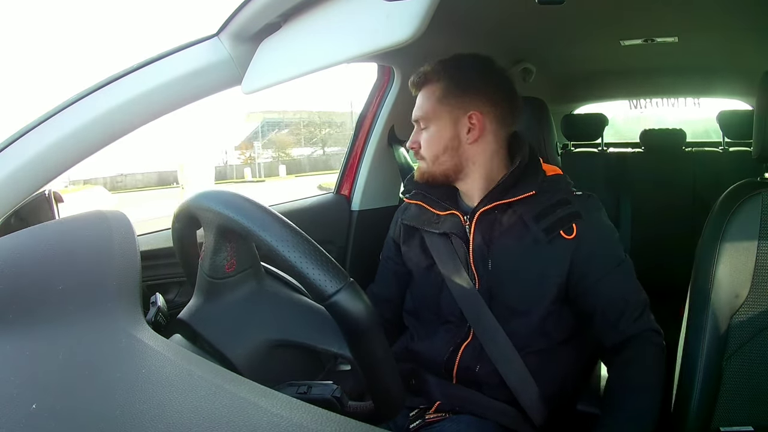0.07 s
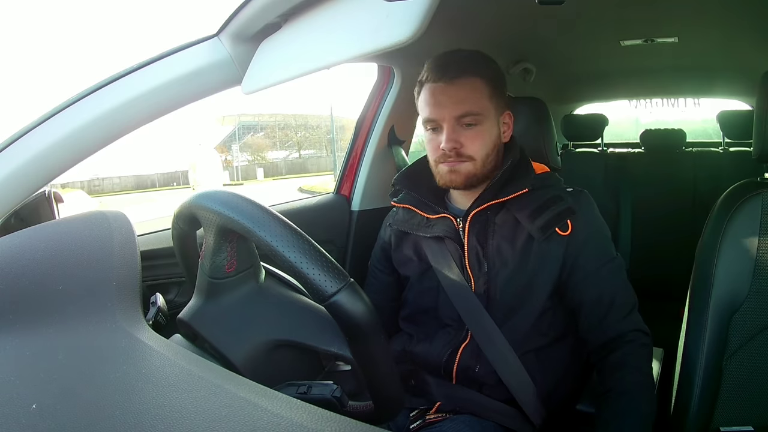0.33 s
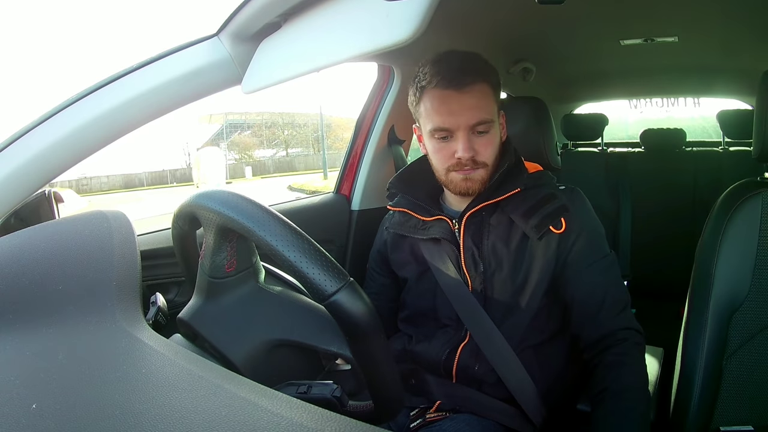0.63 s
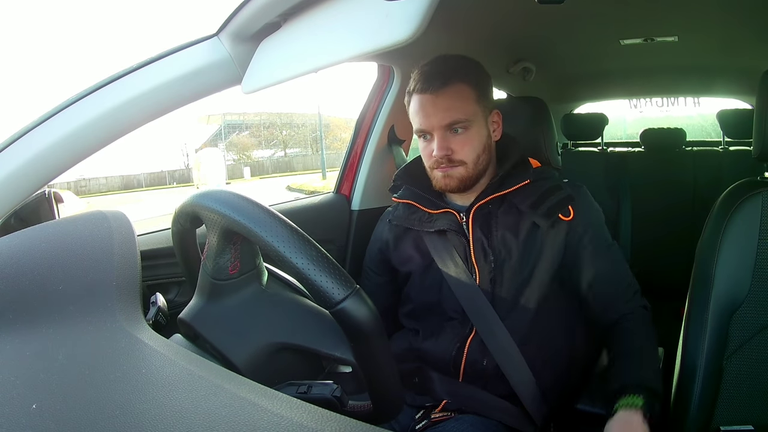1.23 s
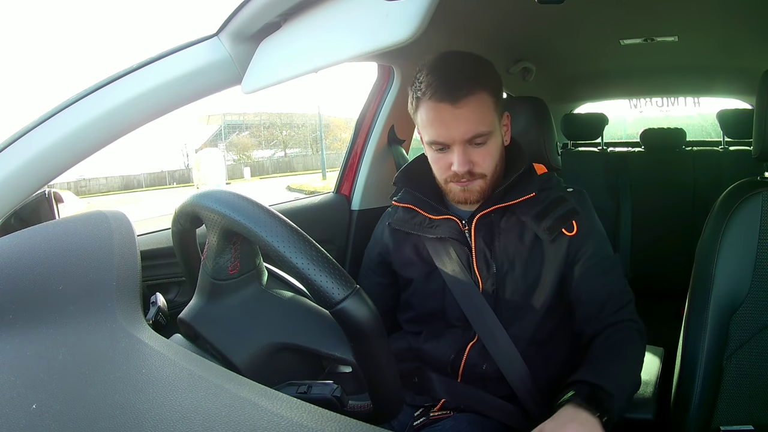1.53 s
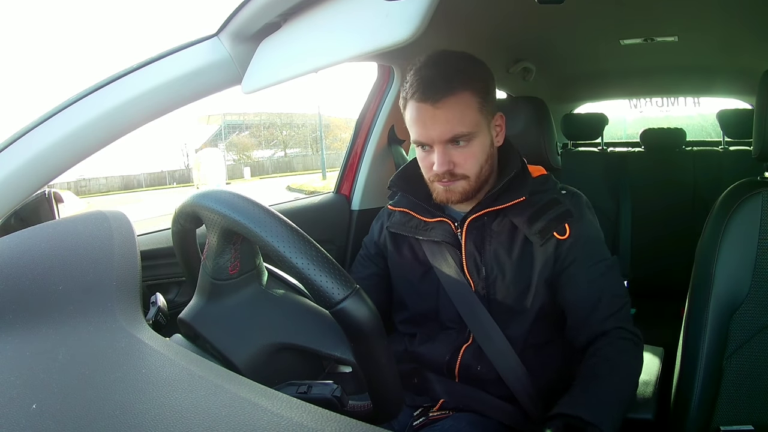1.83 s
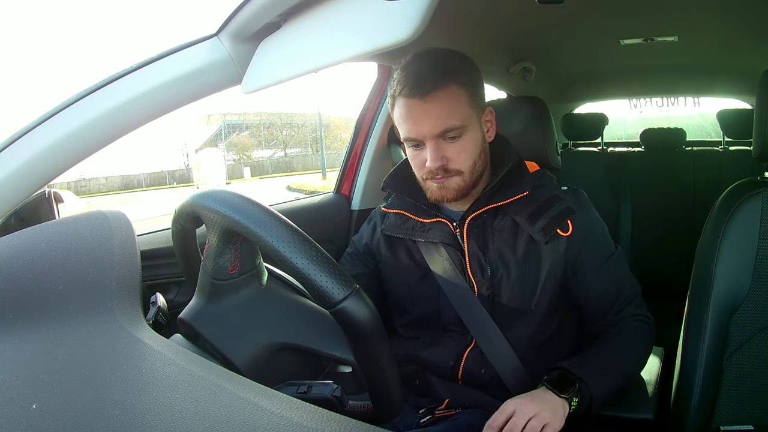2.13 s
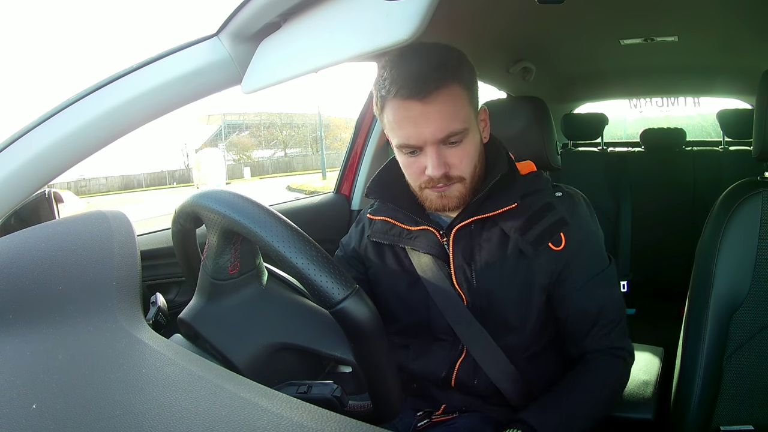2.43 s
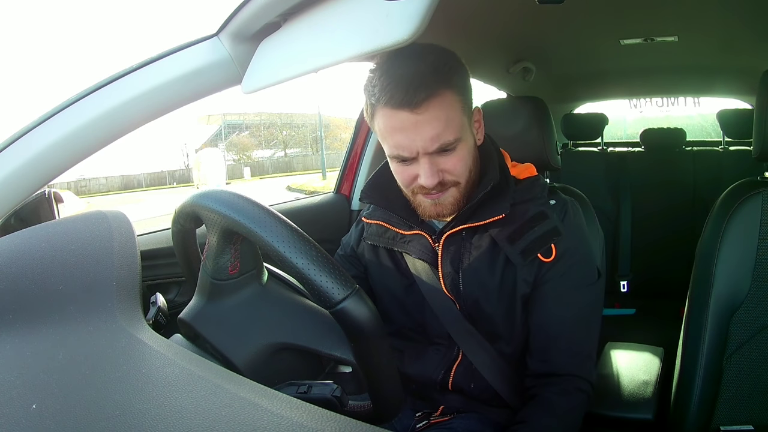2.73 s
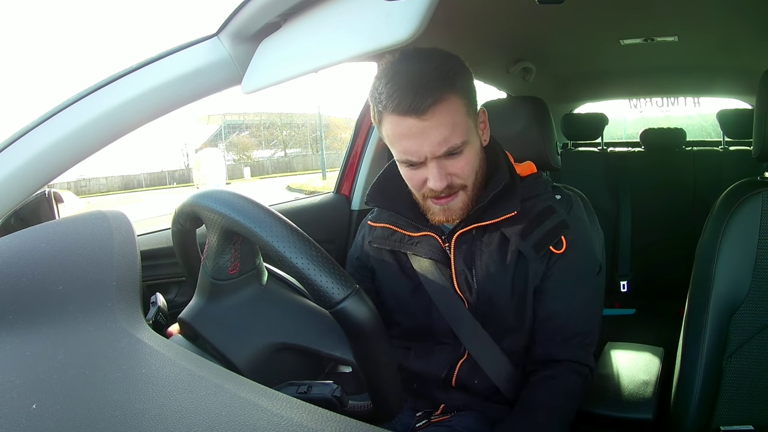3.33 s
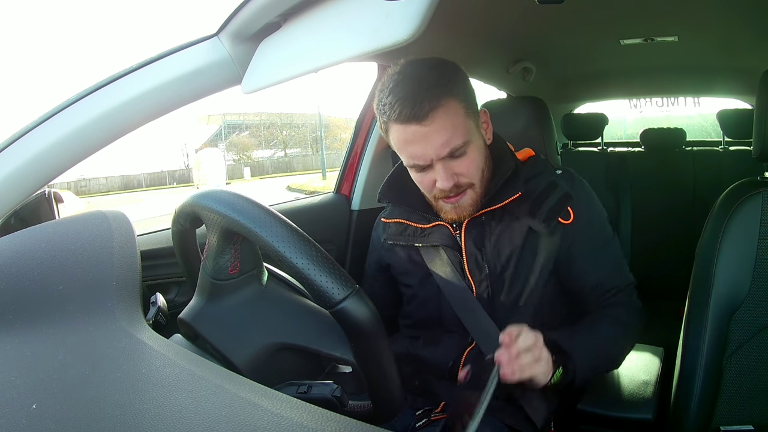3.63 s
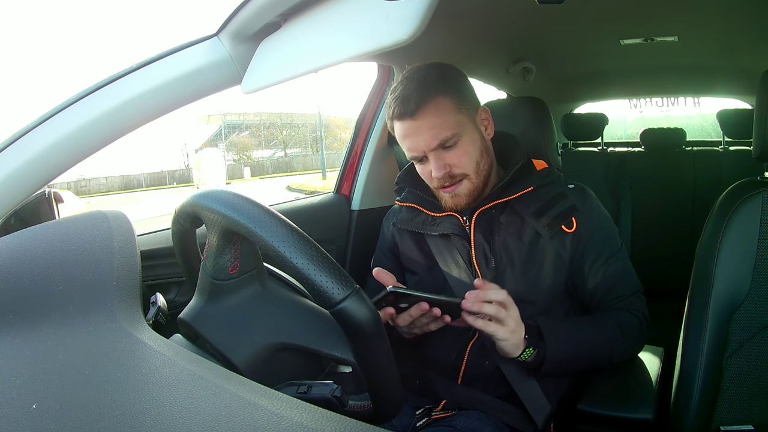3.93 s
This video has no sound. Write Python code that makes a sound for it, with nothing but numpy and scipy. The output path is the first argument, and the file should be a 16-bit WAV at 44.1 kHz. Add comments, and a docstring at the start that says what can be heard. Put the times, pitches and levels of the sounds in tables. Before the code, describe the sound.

Inside a parked car, an idling engine rumbles close to the microphone. A quick, loud handbrake ratchet is followed by dull knocks and small clicks. The engine shudders to a stop with a heavy thump, leaving soft clothing rustle.

```python
"""Inside a parked car: the engine idles, its firing beat booming through the cabin.
The handbrake is pulled up, its pawl cracking over the ratchet teeth, and the engine is switched off.
It runs down to a stop, rocking the body, and ends on a heavy thump. Hands knock and scrape on the
plastic trim, small parts tick, and the driver shuffles in the seat with a rustling jacket."""
import sys
import numpy as np
from scipy import signal
from scipy.fft import rfft, irfft
from scipy.io import wavfile

SR = 44100
rng = np.random.default_rng(int(sys.argv[2]) if len(sys.argv) > 2 else 0)


def master_out(mix):
    """Clip the mix to full scale and print it as 16-bit PCM to the path in sys.argv[1]."""
    frames = np.transpose(np.atleast_2d(mix))
    ceiling = np.clip(frames, -1, 1)
    pcm = np.round(ceiling * 32767).astype(np.int16)
    wavfile.write(sys.argv[1], SR, pcm)


N = 176400
T = np.arange(N) / SR


def amp(db):
    """Decibels to gain."""
    return 10 ** (np.asarray(db) / 20)


def unit(x):
    """Scales to rms 1."""
    return x / np.sqrt(np.mean(x ** 2) + 1e-20)


def curve(points):
    """An automation curve through (t/s, value) points."""
    return np.interp(T, *np.transpose(points))


def eq_gain(points, hz):
    """Gain at hz of an EQ curve drawn through (f/Hz, level/dB) points on a log-frequency axis."""
    f, db = np.transpose(points)
    return amp(np.interp(np.log(hz + 1e-6), np.log(f), db))


def noise(points, size=N, scale=1):
    """Noise of rms 1 coloured by an EQ curve whose frequencies are multiplied by scale."""
    hz = np.fft.rfftfreq(size, 1 / SR)
    white = rfft(rng.standard_normal(size))
    return unit(irfft(white * eq_gain(points, hz / scale) * (hz > 0), size))


def drift(hz, size=16384):
    """Random modulation of rms about 1, rolling off above the given rate."""
    rates = np.fft.rfftfreq(size, T[-1] / size)
    white = rfft(rng.standard_normal(size))
    slow = unit(irfft(white / (1 + (rates / hz) ** 4), size))
    return np.interp(T, np.linspace(0, T[-1], size), slow)


def attack(t, rise):
    """Linear fade-in over rise seconds."""
    return np.minimum(t / rise, 1)


def fade(t, t60):
    """Exponential decay, 60 dB down after t60 seconds."""
    return np.exp(-np.log(1000) * t / t60)


def ring(t, hz, t60, rise):
    """One damped mode with a soft start."""
    return np.sin(2 * np.pi * hz * t) * fade(t, t60) * (1 - np.exp(-(t / rise) ** 2))


def add(mix, s, sound):
    """Mixes a sound in at s seconds."""
    part = mix[max(round(s * SR), 0):][:len(sound)]
    part += sound[:len(part)]


def engine():
    """Wavering orders of the firing rate slide through the cabin's boom; each firing puffs noise."""
    firing_rate = [(0, 24.3), (.16, 25), (.45, 27.3), (.99, 26.7), (1.44, 27.3), (2.02, 23.5), (2.22, 23.8),
                   (2.56, 21.2), (2.75, 11.6), (3.0, 5.75)]  # idle and run-down: t/s, f/Hz
    fader = [(0, -38), (.6, -36.5), (.75, -39), (1.2, -37.5), (1.5, -37.5), (1.75, -35), (2.2, -38),
             (2.48, -40.5), (2.57, -46.5), (2.8, -48), (3.1, -39), (3.3, -81)]  # engine loudness: t/s, level/dB
    boom = [(15, 8.5), (26, -13.5), (52, -10), (77, 2.5), (103, -2.5), (130, -2.5), (156, 0), (182, -13.5),
            (235, -29), (320, -30), (500, -47.5)]  # how the cabin passes the beat: f/Hz, level/dB
    hz = curve(firing_rate)
    phase = 2 * np.pi * np.cumsum(hz) / SR
    beat, power = np.zeros(N), np.zeros(N)
    for order in range(1, 13):
        gain = eq_gain(boom, order * hz)
        waver = 1 + 0.26 * drift(hz=5.8)
        beat += gain * waver * np.cos(order * phase + 2 * np.pi * rng.random())
        power += gain ** 2 / 2
    beat /= np.sqrt(power)  # the boom sets the colour, the fader the level
    puffs = unit(noise(boom) * (1 + 0.35 * np.cos(phase)))
    return amp(curve(fader)) * (beat + amp(-7.5) * puffs)


def background():
    """Deep rumble of the car body and the steady murk from outside."""
    fader = [(0, -34), (.17, -39), (.26, -30.5), (.32, -42), (.39, -36.5), (.6, -51), (.85, -38.5),
             (1.2, -41), (1.7, -65), (2.3, -47.5), (2.75, -44), (2.92, -54), (3.04, -37), (3.2, -46.5),
             (3.6, -59), (4, -78)]  # swells of the rumble: t/s, level/dB
    # colours of the murk and the rumble: f/Hz, level/dB
    murk_eq = [(20, -17.5), (70, 4), (130, -0.5), (200, 1.5), (300, -10.5), (500, -16.5), (1000, -22.5),
               (2000, -35.5), (3200, -49), (4200, -45), (7000, -65), (12000, -52)]
    rumble_eq = [(10, -25), (24, -22.5), (38, -5.5), (50, -12.5), (80, -13), (300, -64), (1000, -100)]
    return amp(curve(fader)) * noise(rumble_eq) + amp(-50) * noise(murk_eq)


def jacket():
    """Fine grains of sliding fabric swell with each arm movement; a low groan comes with one reach."""
    rustle_fader = [(0, -58), (.15, -61), (.33, -59), (.5, -67.5), (.65, -65), (.9, -70.5), (1.15, -73),
                    (1.28, -56), (1.45, -54), (1.68, -58.5), (1.82, -68), (1.95, -68), (2.2, -60),
                    (2.42, -60.5), (2.57, -62.5), (2.78, -61.5), (2.95, -65), (3.15, -69.5), (3.33, -60.5),
                    (3.45, -52.5), (3.55, -52.5), (3.63, -47.5), (3.75, -60.5), (3.87, -57.5), (4, -57.5)]  # arm movements: t/s, level/dB
    cloth_eq = [(100, -10), (400, -1), (900, 1), (1500, -1.5), (2200, -1), (3200, -7), (4200, -4),
                (5500, -8), (7000, -9.5), (9500, -13), (12000, -12.5)]  # colour of the fabric: f/Hz, level/dB
    groan_fader = [(3.33, -49), (3.4, -44), (3.46, -39), (3.51, -37.5), (3.56, -52.5), (3.7, -81)]  # swell of the groan: t/s, level/dB
    cloth = noise(cloth_eq)
    grain_db, flutter_db = drift(hz=820), 0.5 * drift(hz=32)
    rustle = unit(cloth * amp(grain_db + flutter_db))
    groan_hz = 140.4 + 9.13 * drift(hz=30.4)
    groan = np.sin(2 * np.pi * np.cumsum(groan_hz) / SR) * (1 + 0.3 * drift(hz=50))
    return amp(curve(rustle_fader)) * rustle + amp(curve(groan_fader)) * unit(groan)


def seat():
    """The driver's shifting weight makes a lumpy, muffled shuffle."""
    fader = [(0, -47), (.15, -60.5), (.75, -62.5), (.92, -51.5), (1.0, -55), (1.13, -46.5), (1.2, -59),
             (1.4, -40.5), (1.5, -50), (1.62, -60), (1.8, -51), (2.28, -50.5), (2.36, -58), (2.8, -62.5),
             (2.88, -47.5), (2.94, -53), (3.0, -45.5), (3.16, -58.5), (3.3, -53), (3.36, -61.5),
             (3.46, -48), (3.6, -63.5), (4, -65)]  # shifts of weight: t/s, level/dB
    seat_eq = [(80, -24), (190, 1.5), (280, -3), (400, -8), (600, -17), (1000, -24), (2000, -40.5),
               (6000, -54)]  # colour of the shuffle: f/Hz, level/dB
    lumps = amp(3.1 * drift(hz=35))
    return amp(curve(fader)) * unit(noise(seat_eq) * lumps)


def ticks():
    """Small hard plastic parts each click once."""
    cues = [(.077, -46.5, 2100), (.634, -56.5, 2320), (1.478, -48, 1400), (1.76, -52, 1200),
            (1.942, -52, 1940), (2.247, -53, 1600), (3.233, -48, 1750), (3.007, -52, 4360),
            (3.11, -60.5, 5500)]  # clicks: t/s, level/dB, f/Hz
    tick_eq = [(.2, -9), (.75, -14), (1, 1.5), (1.25, -14), (3, -20.5), (6, -29)]  # colour of a click: ratio to its pitch, level/dB
    out, t = np.zeros(N), T[:SR // 8]
    envelope = attack(t, rise=0.0013) * fade(t, t60=0.036)
    for s, db, hz in cues:
        add(out, s, amp(db) * noise(tick_eq, size=len(t), scale=hz) * envelope)
    return out


def knocks():
    """Padded plastic answers a knock with two low modes and a hollow tap; soft touches swell slower."""
    # hands on the trim: t/s, body level/dB, body f/Hz, tap level/dB, tap f/Hz, rise/s
    cues = [(.088, -35.5, 270, -58, 498, 0.0035), (1.091, -26, 243, -39.5, 754, 0.002),
            (1.438, -17, 200.7, -38.5, 460, 0.0066), (1.552, -36, 223, -31, 550, .002),
            (1.715, -32, 276, -43, 480, 0.011), (1.762, -26, 271, -48, 790, 0.008),
            (1.796, -29, 213, -44, 452, 0.0079), (1.853, -34, 332, -41.5, 478, 0.0051),
            (1.937, -28, 315, -43, 500, 0.0067), (1.95, -40, 331, -48.5, 700, .003),
            (1.976, -28.5, 266, -55, 450, .01), (2.047, -25, 304.4, -39.5, 595, 0.0041),
            (2.061, -29.5, 292, -40, 550, 0.0043), (2.086, -25.5, 273, -40, 551.4, 0.0064),
            (2.11, -36, 320, -49, 520, 0.0052), (2.147, -29.5, 299.5, -40.5, 470, .003),
            (2.174, -28, 281, -44, 470, 0.0076), (2.20, -45, 280, -63, 480, 0.0063),
            (2.228, -27, 239.5, -44, 441, 0.011), (2.245, -32.5, 284, -50, 910, .006),
            (2.275, -34, 223, -51, 600, 0.0087), (2.52, -43.5, 269, -51, 700, 0.0048),
            (2.859, -30, 177, -46, 398, 0.0075), (2.872, -36, 320, -46, 480, 0.0055),
            (3.229, -28.5, 319.6, -58, 600, 0.0046), (3.258, -21.5, 179, -51, 610, 0.0058)]
    tap_eq = [(.2, 2), (.6, -1.5), (1, 1), (1.5, -14), (3, -30), (8, -48), (20, -76)]  # colour of a tap: ratio to its pitch, level/dB
    body_t60, tap_t60, scuff_t60 = 0.092, 0.041, 0.091  # seconds
    out, t = np.zeros(N), T[:SR // 4]
    for s, body_db, body_hz, tap_db, tap_hz, rise in cues:
        low_mode = amp(-4.5) * ring(t, 0.735 * body_hz, body_t60, rise)
        body = ring(t, body_hz, body_t60, rise) + low_mode
        envelope = attack(t, rise) * fade(np.maximum(t - rise, 0), scuff_t60)
        scuff = noise(tap_eq, size=len(t), scale=tap_hz) * envelope
        tap = amp(-1) * (ring(t, tap_hz, tap_t60, rise / 2) + scuff)
        add(out, s, amp(body_db) * body + amp(tap_db) * tap)
    return out


def handbrake():
    """The pawl cracks over each tooth and jolts the lever; the run keeps steel and console ringing."""
    teeth = [(1.295, -25, -1), (1.3032, 0, 1), (1.311, -1, 0), (1.318, -2, 5), (1.3244, 1, 6),
             (1.332, 1, -1), (1.341, 1, 0), (1.3498, 1.5, -5), (1.357, -8, -5), (1.3646, -2, -5),
             (1.37, -8, -7)]  # ratchet teeth: t/s, level/dB, treble tilt of the ring/(dB per octave)
    crack_eq = [(100, -2), (280, 2), (550, 1), (850, -4), (1300, -6), (1900, 0), (2500, -6.5), (3300, -9.5),
                (4300, -5), (5500, -4.5), (7000, -7.5), (9500, -10.5), (12000, -12)]  # colour of a tooth's crack: f/Hz, level/dB
    modes = [(199, -40.5, 0.11), (277.7, -39.5, 0.12), (330, -45, 0.12), (436, -37.5, .11),
             (515, -45, 0.091), (578, -44, .1), (690, -49, .08), (1462, -42.5, 0.087), (1842, -39, 0.058),
             (1980, -39, 0.067), (2770, -48, 0.094), (3974, -38, 0.045), (4200, -46.5, 0.067),
             (4660, -41, .05), (5000, -49, .06), (5220, -47, .06), (6200, -56, 0.044)]  # pawl, lever and console resonances: f/Hz, level/dB, t60/s
    tilt_pivot_hz, wander_rad = 1900, 0.78
    out, t = np.zeros(N), T[:SR // 4]
    snap = amp(-27.5) * fade(t, t60=0.065)
    cabin_tail = amp(-49.5) * fade(t, t60=0.18)
    lever = amp(-24.5) * ring(t, hz=128, t60=0.07, rise=0.0033)
    for s, db, _ in teeth:
        crack = noise(crack_eq, size=len(t)) * (snap + cabin_tail)
        add(out, s, amp(db) * (crack + lever) * attack(t, rise=0.0017))
    for hz, mode_db, t60 in modes:
        octaves_above = max(np.log2(hz / tilt_pivot_hz), 0)
        kick = attack(t, rise=0.0016) * fade(t, t60)
        envelope = np.zeros(N)
        for s, db, tilt in teeth:
            add(envelope, s, amp(mode_db + db + tilt * octaves_above) * kick)
        out += envelope * np.sin(2 * np.pi * hz * T + wander_rad * drift(hz=50))
    return out


def shudders():
    """The car body rocks on the last strokes of the engine and after the thump."""
    thuds = [(2.335, -23, 85, 0.076), (2.382, -26, 80, 0.11), (2.469, -19.5, 72.5, .12),
             (2.605, -23, 85, 0.096), (2.67, -23, 72.4, 0.076), (2.752, -20, 90, 0.075),
             (2.851, -18.5, 131, 0.048), (2.874, -18.5, 148.5, 0.088), (2.98, -17, 121, 0.042),
             (3.023, -20, 72.4, 0.33), (3.034, -15, 191, 0.076), (3.101, -24.5, 115, 0.087)]  # dull body modes: t/s, level/dB, f/Hz, t60/s
    out, t = np.zeros(N), T[:SR // 2]
    for s, db, hz, t60 in thuds:
        add(out, s, amp(db) * ring(t, hz, t60, rise=0.0045))
    return out


def scrapes():
    """A hand slips unevenly over plastic."""
    slips = [(2.625, 0.02, -43.5), (2.644, 0.041, -45), (3.23, 0.019, -44.5), (3.257, 0.018, -46.5)]  # short strokes: t/s, length/s, level/dB
    scrape_eq = [(150, -11), (350, 6.5), (520, -3.5), (720, 1), (1000, -8), (1600, -14), (2700, -18.5),
                 (3400, -23), (4500, -23), (7000, -31), (12000, -32)]  # colour of the friction: f/Hz, level/dB
    edge_s = 0.0037
    force = np.zeros(N)
    for s, length, db in slips:
        inside_s = np.minimum(T - s, s + length - T)
        force += amp(db) * np.clip(inside_s / edge_s + 0.5, 0, 1)
    return force * unit(noise(scrape_eq) * amp(drift(hz=170)))


def thump():
    """One sharp push and its rebound as the engine stops; a plastic panel clacks and rings briefly."""
    clack_eq = [(150, -1), (350, 11), (560, -12), (850, 0), (1300, -3), (2000, -23), (3200, -27),
                (4300, -20), (6000, -25.5), (12000, -24.5)]  # colour of the clack: f/Hz, level/dB
    panel_modes = [(390, -30, 0.047), (850, -34, 0.036), (1275, -41, .04)]  # panel resonances: f/Hz, level/dB, t60/s
    push_s, push_width_s = 3.0214, 0.00044
    rebound_s, rebound_width_s = 3.0233, 0.00064
    push = amp(-15.5) * np.exp(-((T - push_s) / push_width_s) ** 2 / 2)
    rebound = amp(-12.5) * np.exp(-((T - rebound_s) / rebound_width_s) ** 2 / 2)
    out, t = push - rebound, T[:SR // 4]
    clack = amp(-34) * noise(clack_eq, size=len(t)) * attack(t, rise=0.00111) * fade(t, t60=0.061)
    panel = sum(amp(db) * ring(t, hz, t60, rise=0.00044) for hz, db, t60 in panel_modes)
    add(out, push_s - push_width_s, clack + panel)
    low_cut = signal.butter(1, 45, "high", fs=SR, output="sos")
    return signal.sosfilt(low_cut, out)


def scene():
    """Car and driver in mono, heard from the dashboard."""
    car = engine() + background() + shudders() + thump()
    driver = jacket() + seat() + ticks() + knocks() + handbrake() + scrapes()
    return (car + driver)[None]


def record(dry):
    """The microphone's treble notch, its own hiss and a steep high cut."""
    notch_hz, notch_width_hz, high_cut_hz = 8010, 1370, 12100
    b, a = signal.iirnotch(notch_hz, notch_hz / notch_width_hz, SR)
    hiss = amp(-72.5) * rng.standard_normal(dry.shape)
    high_cut = signal.firwin(1023, high_cut_hz, window=("kaiser", 9), fs=SR)
    return signal.oaconvolve(signal.lfilter(b, a, dry) + hiss, high_cut[None], "same")


dry = scene()
out = record(dry)
master_out(out)
```